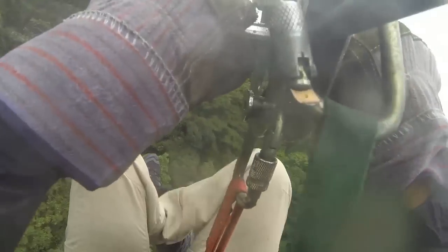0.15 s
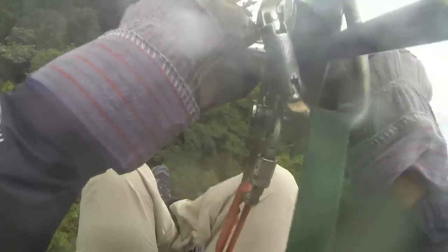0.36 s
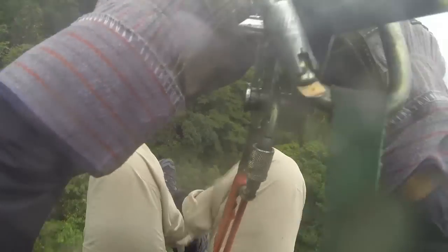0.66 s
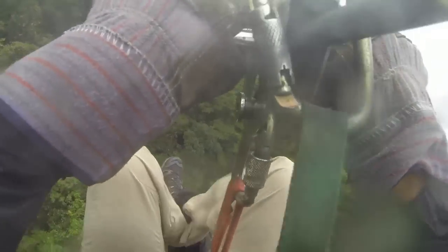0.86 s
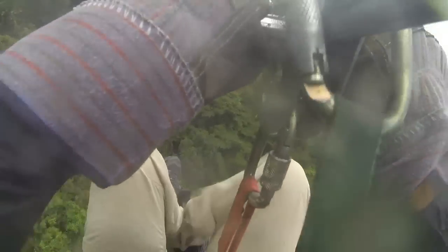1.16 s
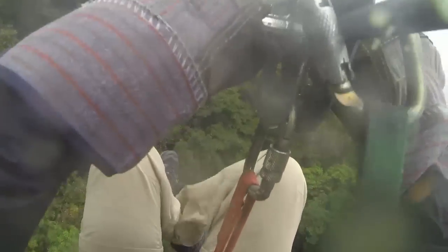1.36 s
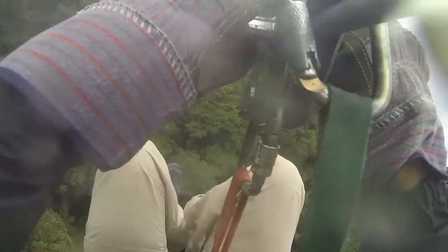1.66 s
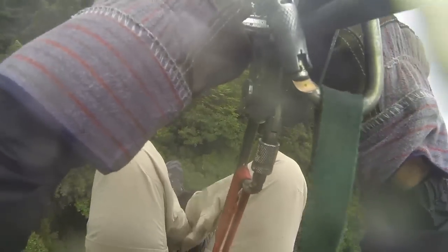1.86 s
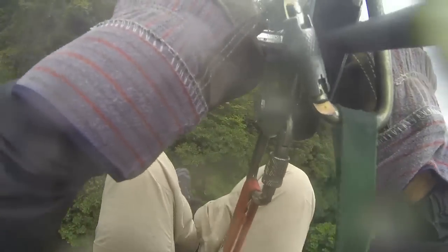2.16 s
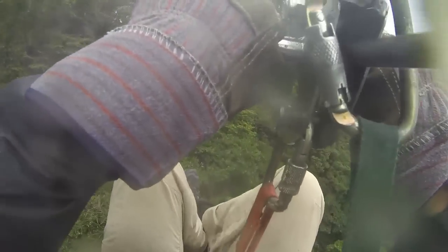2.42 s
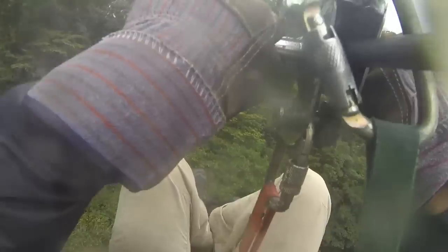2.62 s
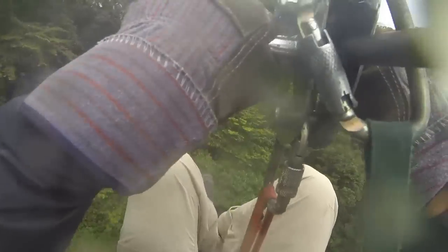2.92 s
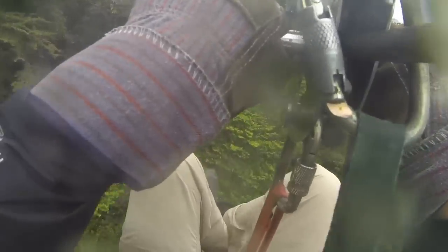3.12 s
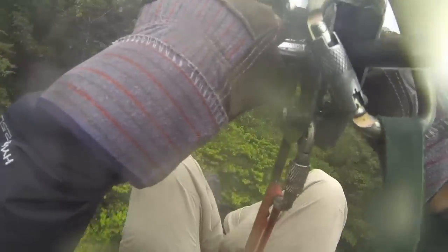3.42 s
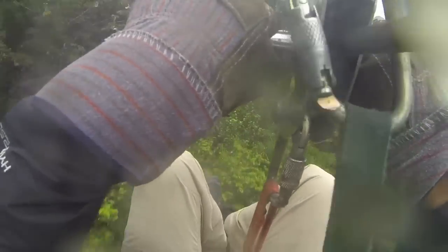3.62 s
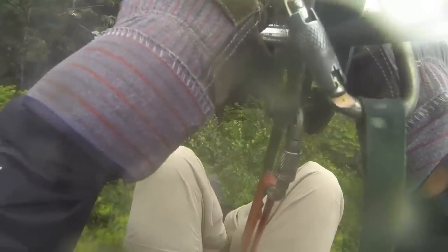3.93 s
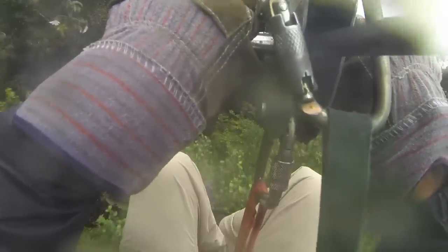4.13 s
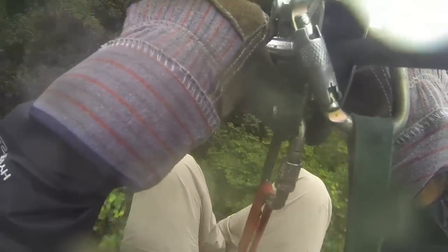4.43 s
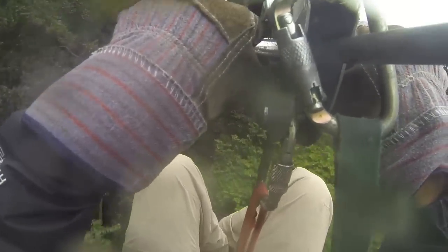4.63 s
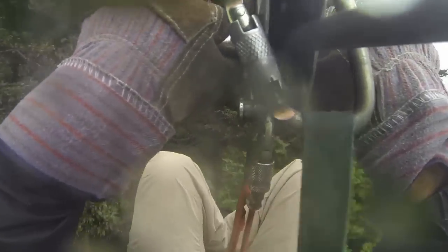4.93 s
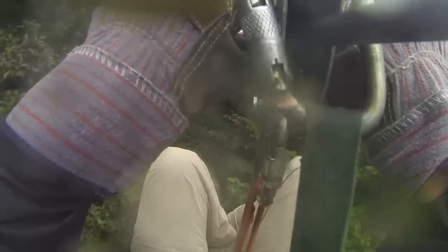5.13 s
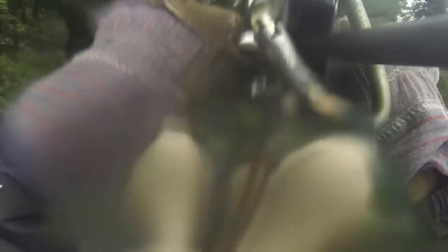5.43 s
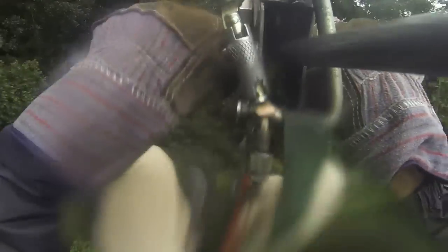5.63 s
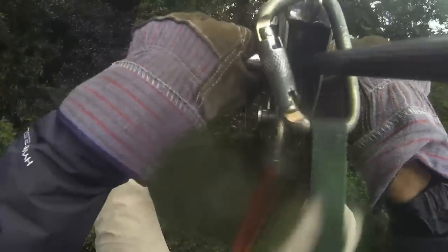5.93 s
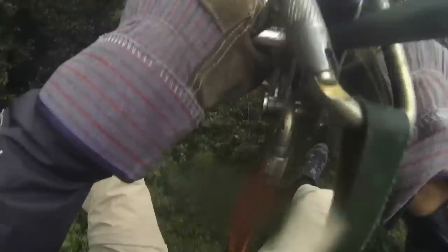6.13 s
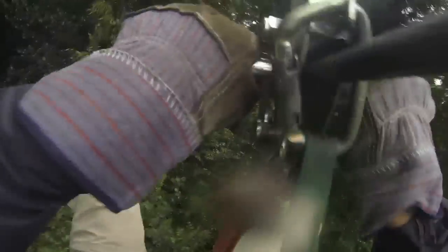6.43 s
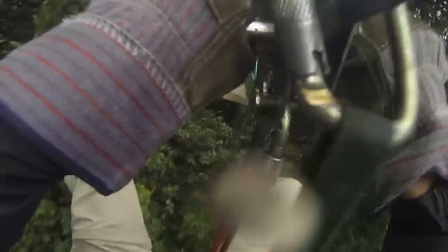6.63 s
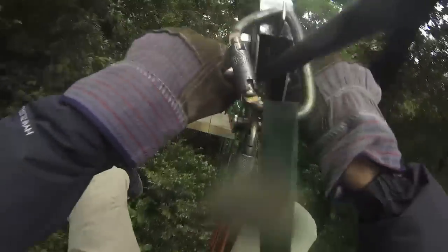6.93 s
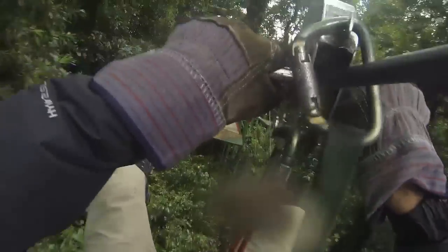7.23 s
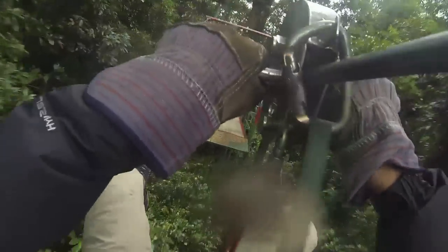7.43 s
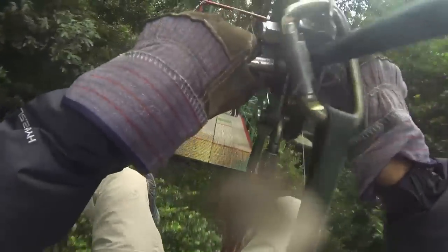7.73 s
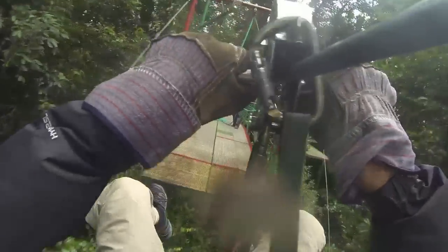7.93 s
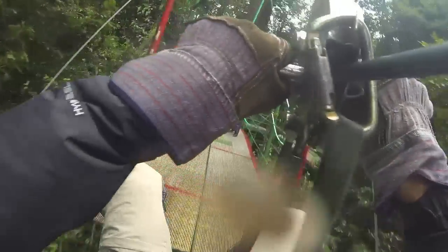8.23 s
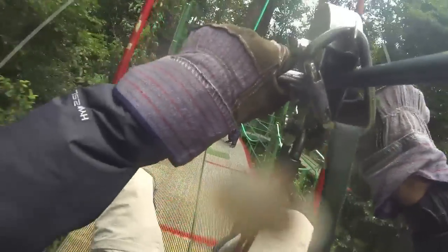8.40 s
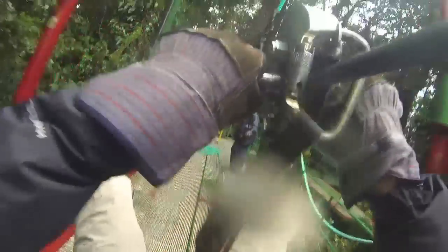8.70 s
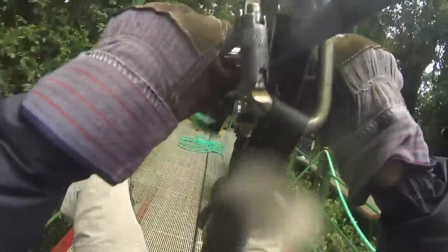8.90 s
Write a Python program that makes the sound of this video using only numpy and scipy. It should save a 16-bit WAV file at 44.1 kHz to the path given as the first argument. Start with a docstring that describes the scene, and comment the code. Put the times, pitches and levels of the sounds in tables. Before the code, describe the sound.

Close, dry pulley wheels roll down a zip line with a high whine and bright cable hiss, while wind and a low rumble sit underneath. After an opening squeal come three loud, squeaky metal clatters, one early and two close together later; after each the rolling dips and swells back. The pitch sinks steadily as the trolley slows, ending with a brief rasp, loose gear ticking, a dull harness bump and a faint squeak.

```python
"""A zip line trolley coasts down a steel cable, heard from a camera close under the pulleys. A flange squeals
at the start; the wheels whine and hiss over hanger rumble and wind on the microphone. Near 0.9, 5.7 and 6.4 s
the hardware clatters and squeaks, a carabiner rings and the limiter ducks; each time the whole scene, rolling,
rumble and wind alike, sinks and swells back, the whine falling as the wheels slow. Near the platform come a
short scrape, ticks of loose gear, a soft harness bump and a last faint squeak."""
import sys
import numpy as np
from scipy import signal
from scipy.fft import rfft, irfft, next_fast_len
from scipy.io import wavfile
from scipy.ndimage import uniform_filter1d

SR = 44100
rng = np.random.default_rng(int(sys.argv[2]) if len(sys.argv) > 2 else 0)


def int16_out(signal):
    """Quantize to a 16-bit WAV file."""
    q = np.round(np.clip(np.atleast_2d(signal).T, -1, 1) * 32767)
    wavfile.write(sys.argv[1], SR, q.astype(np.int16))


N = 399546
TIME = np.arange(N) / SR

# The coast. Each row: time in seconds, wheel speed in turns per second.
WHEEL_SPEED = [(0, 145), (.4, 142.3), (1.2, 133.8), (1.5, 132.8), (2.05, 120.3), (2.6, 116.3), (3, 118.9),
               (4, 111.6), (4.8, 103.2), (5.6, 98.7), (6.3, 89.4), (7, 76.7), (8.1, 62.7), (9.06, 56)]
# Faders for the rolling, before trims. Each row: time in seconds, then wheel, plate and hiss in dB.
ROLL_FADERS = [(0.3, -32.5, -36.5, -40), (0.8, -28, -30.0, -40), (1.2, -32, -41.5, -45),
               (1.55, -30, -36, -43.5), (2.3, -28, -31.5, -38), (3.65, -27.0, -33.5, -39.5),
               (3.95, -22.5, -30.5, -38), (4.65, -26.5, -33.5, -39.0), (4.85, -24.5, -32.0, -40.5),
               (5.15, -27.5, -32, -39), (5.68, -26.5, -31, -40), (5.93, -39, -44.5, -55.5),
               (6.05, -45.0, -48.5, -59.5), (6.39, -35, -43, -50), (6.85, -41, -48.5, -56.5),
               (7.3, -41, -48.5, -55.0), (7.55, -31, -38.5, -48), (7.95, -29.5, -33.5, -43.5),
               (8.12, -35.5, -43.5, -51), (8.6, -39.5, -43, -50.5), (8.72, -29.5, -37, -46.5),
               (8.95, -34, -42.5, -52.5), (9.05, -21, -34.5, -39.5)]
def rolling(flutter_db=1.08, rattle_db=1.07, sway_db=0.36, trims_db=(0.27, -2, -1)):
    """Groove and cable strands shake wheels and side plates; the force flutters and the load sways."""
    spin, turns, slow = motion()
    groove = tread(turns, memory=0.74)
    strands = rng.standard_normal(N)
    force = gain_of(flutter_db * wander(30) + rattle_db * wander(220))
    grip = 0.48 - 0.22 * slow  # less of the noise repeats each turn at a crawl

    def contact(repeating):
        return force * (np.sqrt(repeating) * groove + np.sqrt(1 - repeating) * strands)

    layers = (wheels(contact(0.22 * grip), spin, turns, slow),
              side_plates(contact(grip), slow),
              cable_hiss(contact(0.5 * grip)))
    return sum(gain_of(db + trim + sway_db * wander(4)) * layer
               for db, trim, layer in zip(curves(ROLL_FADERS), trims_db, layers))


# The wheels' ring. Each row: pitch in Hz, width in Hz, relative dB at full speed and at a crawl.
WHEEL_MODES = [(1477, 194, -8.5, -3.5), (1650, 173, 2, 3.5), (1842, 214, 2, 3.5), (1947, 250, 2, -15)]
# The whine. Each row: multiple of the turn rate, relative level in dB.
WHINE_HARMONICS = [(11, -9.5), (15, 0.5), (16, -0.5), (18, -2), (21, -5.5)]
def wheels(drive, spin, turns, slow, sweet_turns_per_s=98, spread_turns_per_s=31.5):
    """The wheels ring with the contact noise and whine most around one speed."""
    whine_db = -16 + 10 * np.exp(-((spin - sweet_turns_per_s) / spread_turns_per_s) ** 2)
    whine = ringing(partials(WHINE_HARMONICS, turns, width_hz=14), WHEEL_MODES, slow)
    return evened(ringing(drive, WHEEL_MODES, slow) + gain_of(whine_db) * whine)


# The plates' ring. Each row: pitch in Hz, width in Hz, relative dB at full speed and at a crawl.
PLATE_MODES = [(2224, 180, 8, -14), (2380, 220, -12, -6.5), (2767, 197, 4.5, 8), (2990, 320, -2, -9.5)]
def side_plates(drive, slow):
    """The shaken side plates ring above the wheels."""
    return ringing(drive, PLATE_MODES, slow)


# The tone of the hiss. Each row: frequency in Hz, relative level in dB.
HISS_EQ = [(2600, -43), (3200, -12.5), (3450, -5.5), (3720, -1.5), (3900, -1.5), (4150, 4), (4830, 8.5),
           (5200, -1.5), (5600, -11.5), (6350, -12), (7100, -24), (9700, -31.5), (11200, -46.5),
           (12500, -64)]
def cable_hiss(drive):
    """Rubbing over the cable strands makes a bright hiss."""
    return coloured(drive, spectrum, HISS_EQ)


# The rims' narrow notes. Each row: pitch in Hz, width in Hz, relative level in dB.
RIM_MODES = [(2803, 153, 2), (3710, 160, -15.5), (4913, 200, -6.5), (6370, 170, -22.5)]
# The groove's strong harmonics. Each row: multiple of the turn rate, relative level in dB.
GROOVE_HARMONICS = [(18, -2), (20, 0), (23, 2.5), (24, -5), (28, 1), (35, -2.5)]
def rims(fast_db=-2.5, crawl_db=-19, song_db=-5.5, drift_db=1.26):
    """The groove's lasting bumps make the rims sing; harmonics flare as they glide through a rim note."""
    _, turns, slow = motion()
    ring = coloured(tread(turns, memory=0.877), resonances, RIM_MODES)
    song = coloured(partials(GROOVE_HARMONICS, turns, width_hz=10), resonances, RIM_MODES)
    plate_db = curves(ROLL_FADERS)[1]
    db = plate_db + fast_db + (crawl_db - fast_db) * slow + drift_db * wander(4)
    return gain_of(db) * (ring + gain_of(song_db) * song)


# Steel on steel. Each row: start in seconds, chatter length in seconds, level in dB.
CLASHES = [(.912, .0068, -11), (0.919, 0.0069, 9), (0.9332, 0.0052, 9.5), (.9438, .0042, 10),
           (0.957, 0.0049, 10), (.973, .0043, 10), (5.7241, 0.0028, -0.5), (5.738, 0.0048, 4.5),
           (5.7566, 0.0093, 0.5), (5.7773, 0.0095, 2.5), (6.4152, 0.0048, 5.5), (6.4195, 0.0078, 4.5),
           (6.4351, 0.038, 4.5), (6.485, .0024, 7), (6.491, 0.011, 4), (6.5088, 0.017, 4),
           (6.5329, .006, 5.5), (6.546, 0.0096, 6), (6.5686, 0.0083, 5), (6.5964, 0.045, 3.5),
           (6.655, 0.0074, 3), (6.7864, 0.00037, -9.5), (9.031, 0.0046, -19.5), (9.051, 0.015, -16.5)]
# Runs of clashes with one character. Each row: start in seconds, thud in dB against the clash,
# opening share of squeak from 0 to 1, pitch in Hz that the squeak falls to.
BOUTS = [(.8, -25.5, 0.78, 1705), (5.6, -10.5, .06, 1500), (6.3, -15.5, 0.61, 1477), (8.9, -21, 1, 1602)]
# Bright steel clank and dull hanger thud. Each row: frequency in Hz, relative level in dB.
CLANK_EQ = [(100, -30), (800, -11.5), (1200, -1.5), (1500, 9), (1850, -6.5), (2200, 0), (2650, -7),
            (3200, -22), (4700, -30), (6000, -44.5), (9000, -59.5), (14000, -91)]
THUD_EQ = [(30, -12.5), (120, -6.5), (270, 1.5), (480, -3.5), (900, 0.5), (1500, -21.5), (10000, -77)]
def clatter(edge_s=0.002, taps_per_s=900, catch_hz=1880, settle_s=0.00654, jitter_hz=130):
    """Each clash is a chatter of taps and scraping with a falling stick-slip squeak."""
    out, t = np.zeros(N), np.arange(SR // 2) / SR
    for start, length, db in CLASHES:
        bout_start, thud_db, share, slip_hz = max(bout for bout in BOUTS if bout[0] <= start)
        first = min(clash[0] for clash in CLASHES if clash[0] >= bout_start)
        thud_db += 7 * np.exp((first - start) / 0.013)  # a bout opens with a heavier thud
        share = share * np.exp(-(t / 0.025) ** 2)  # a dragging contact stops squeaking
        press = np.exp(-np.clip((t - length) / edge_s, 0, 20))
        taps = (rng.random(len(t)) < taps_per_s / SR) * rng.choice([-1, 1], len(t))
        chatter = press * (evened(taps) + 0.74 * rng.standard_normal(len(t)))
        strength = np.sqrt(np.mean(press ** 2))
        clank, thud = (strength * evened(struck(chatter, eq)[:len(t)]) for eq in (CLANK_EQ, THUD_EQ))
        jitter = evened(uniform_filter1d(rng.standard_normal(len(t)), size=60))
        hz = slip_hz + (catch_hz - slip_hz) * np.exp(-t / settle_s) + jitter_hz * jitter
        tone = np.sqrt(2) * np.sin(2 * np.pi * np.cumsum(hz) / SR)
        squeak = press * (1 - np.exp(-t / edge_s)) * tone
        hit = np.sqrt(1 - share) * clank + np.sqrt(share) * squeak + gain_of(thud_db) * thud
        add(out, start, gain_of(db) * hit)
    return out


# Blows on the carabiner. Each row: start in seconds, level in dB.
CARABINER_HITS = [(.973, -7.5), (5.777, -18), (6.568, 0), (6.655, -13.5)]
def carabiner(pitch_hz=1814, t60_s=0.24):
    """The struck carabiner holds one clear note that outlasts the clatter."""
    out, t = np.zeros(N), np.arange(SR // 2) / SR
    for start, db in CARABINER_HITS:
        add(out, start, gain_of(db - 60 * t / t60_s) * np.sin(2 * np.pi * pitch_hz * t))
    return out


def flange_squeal(start_hz=1770, sag_hz_per_s=246, peak_s=0.18, swell_s=0.031, release_s=0.059):
    """The flange rubs the cable: a sagging note over rubbing noise that swells, then lets go."""
    swell = np.exp(-((TIME - peak_s) / swell_s) ** 2)
    db = -23 + 6 * swell + 2 * wander(32)
    hold = np.exp(-np.maximum(TIME - peak_s, 0) / release_s)
    hz = start_hz - sag_hz_per_s * TIME + 9 * wander(39.4)
    rubbing = coloured(rng.standard_normal(N), resonances, [mode[:3] for mode in WHEEL_MODES])
    return gain_of(db) * hold * (np.sin(2 * np.pi * np.cumsum(hz) / SR) + 0.49 * rubbing)


def scrape(peak_s=7.93, half_length_s=0.075, level_db=-43, rasp_db=3):
    """Something drags briefly on the cable strands with a rasping hiss."""
    press = np.exp(-((TIME - peak_s) / half_length_s) ** 2)
    return press * gain_of(level_db + rasp_db * wander(150)) * cable_hiss(rng.standard_normal(N))


def loose_gear(start_s=8.5, ticks_per_s=12, level_db=-16, spread_db=3):
    """Loose steel ticks at random as the rider readies to land."""
    ticks = (rng.random(N) < ticks_per_s / SR) * (TIME > start_s)
    return struck(ticks * gain_of(level_db + spread_db * rng.standard_normal(N)), CLANK_EQ)


# The hanger's low body. Each row: frequency in Hz, relative level in dB.
HANGER_EQ = [(35, 2.5), (70, 9.5), (130, 5), (185, 0.5), (275, 6.5), (350, -10), (500, -13.5), (800, -12),
             (1100, -27.5), (1400, -8.5), (5000, -90.5)]
def harness_bump(start_s=8.744, level_db=-28.5, decay_s=0.015):
    """The harness knocks dully against the hanger."""
    push = (TIME > start_s) * np.exp(-abs(TIME - start_s) / decay_s)
    return gain_of(level_db) * struck(push * rng.standard_normal(N), HANGER_EQ)


# Faders for the low bed. Each row: time in seconds, hanger rumble in dB, wind in dB.
BED_FADERS = [(.4, -34.5, -36.5), (.85, -32, -33.5), (1.2, -40, -45), (2.1, -36.5, -38.5),
              (4.2, -36.5, -38.5), (5.68, -41, -41.5), (5.9, -55, -52), (6.38, -48, -41.5),
              (6.8, -57, -49.5), (7.62, -43.5, -38.5), (8.1, -49.5, -37), (9, -52, -29.5)]
def hanger_rumble(lump_db=1.1):
    """Cable vibration comes down the hanger as a lumpy rumble."""
    db = curves(BED_FADERS)[0] + lump_db * wander(25)
    return gain_of(db) * coloured(rng.standard_normal(N), spectrum, HANGER_EQ)


# The wind's deep tone. Each row: frequency in Hz, relative level in dB.
WIND_EQ = [(5, -6), (22, -1), (45, -2), (58, -12.5), (90, -30.5), (1000, -100)]
def wind(gust_db=1.2):
    """Wind bumps the microphone in slow gusts."""
    db = curves(BED_FADERS)[1] + gust_db * wander(2.3)
    return gain_of(db) * coloured(rng.standard_normal(N), spectrum, WIND_EQ)


def motion():
    """Turns per second, turns so far, and slowness from 0 at full speed to 1 at a crawl."""
    spin = curves(WHEEL_SPEED)[0]
    return spin, np.cumsum(spin) / SR, (spin.max() - spin) / np.ptp(spin)


def tread(turns, memory, bumps_per_turn=320):
    """The groove's roughness comes round every turn; the higher the memory, the slower it changes."""
    bumps = rng.standard_normal((int(turns[-1]) + 2, bumps_per_turn))
    bumps = signal.lfilter([1], [1, -memory], bumps, axis=0).ravel()
    return evened(np.interp(turns * bumps_per_turn, np.arange(len(bumps)), bumps))


def partials(harmonics, turns, width_hz):
    """Wavering tones on multiples of the turn rate."""
    angle = 2 * np.pi * turns
    return sum(gain_of(db) * (wander(width_hz) * np.cos(k * angle) + wander(width_hz) * np.sin(k * angle))
               for k, db in harmonics)


def ringing(drive, modes, slow):
    """Resonances that crossfade from their full-speed balance to their crawl balance."""
    fast = coloured(drive, resonances, np.array(modes)[:, [0, 1, 2]])
    crawl = coloured(drive, resonances, np.array(modes)[:, [0, 1, 3]])
    return evened((1 - slow) * fast + slow * crawl)


def struck(x, eq, size=2048):
    """A body rings after each blow: a minimum-phase filter of unit energy."""
    log_gain = np.log(spectrum(eq, abs(np.fft.fftfreq(size, 1 / SR))))
    response = np.fft.ifft(np.exp(np.conj(signal.hilbert(log_gain)))).real
    return signal.oaconvolve(x, response / np.linalg.norm(response))[:N]


def coloured(x, shape, table):
    """Filtered by a spectrum or by resonances, at unit rms."""
    size = next_fast_len(N, True)
    response = shape(table, np.fft.rfftfreq(size, 1 / SR))
    return evened(irfft(rfft(x, size) * response, size)[:N])


def spectrum(eq, hz):
    """Gain of an EQ curve drawn on a log-frequency axis."""
    f, db = np.transpose(eq)
    return gain_of(np.interp(np.log(hz + 1), np.log(f + 1), db))


def resonances(modes, hz):
    """Gain of a few steep-sided resonances."""
    return np.sqrt(sum((gain_of(db) / (1 + (2 * (hz - f) / width) ** 2)) ** 2 for f, width, db in modes))


def wander(rate_hz):
    """Smooth random drift at unit rms."""
    knots = rng.standard_normal(int(TIME[-1] * rate_hz * 2) + 3)
    return evened(np.interp(TIME * rate_hz * 2, np.arange(len(knots)), knots))


def curves(rows):
    """One automation curve for each column after the time."""
    times, *columns = np.transpose(rows)
    return [np.interp(TIME, times, column) for column in columns]


def add(mix, start_s, sound):
    """Mixes a sound in at its start time."""
    part = mix[round(start_s * SR):][:len(sound)]
    part += sound[:len(part)]


def gain_of(db):
    """Decibels to amplitude."""
    return 10 ** (np.asarray(db) / 20)


def evened(x):
    """Scaled to unit rms."""
    return x / np.sqrt(np.mean(x ** 2) + 1e-20)


def scene():
    """Everything rides along with the microphone in open air: close, dry and mono."""
    ride = rolling() + flange_squeal() + hanger_rumble() + wind() + rims()
    return (ride + clatter() + carabiner() + scrape() + loose_gear() + harness_bump())[None]


def record(dry, threshold_db=-8, recovery_db_per_s=125, attack_s=0.0023, cutoff_hz=16000):
    """The camera's limiter clamps fast and recovers slowly; the first blows slip through and distort."""
    over_db = np.maximum(20 * np.log10(abs(dry[0]) + 1e-9) - threshold_db, 0)
    recovery_db = TIME * recovery_db_per_s
    held_db = np.maximum.accumulate(over_db + recovery_db) - recovery_db
    pole = np.exp(-1 / (attack_s * SR))
    duck_db = signal.lfilter([1 - pole], [1, -pole], held_db)
    clipped = np.clip(dry / gain_of(duck_db), -1, 1)
    lowpass = signal.firwin(255, cutoff_hz, window=("kaiser", 8), fs=SR)
    return signal.oaconvolve(clipped, lowpass[None], "same")


dry = scene()
out = record(dry)
int16_out(out)
```